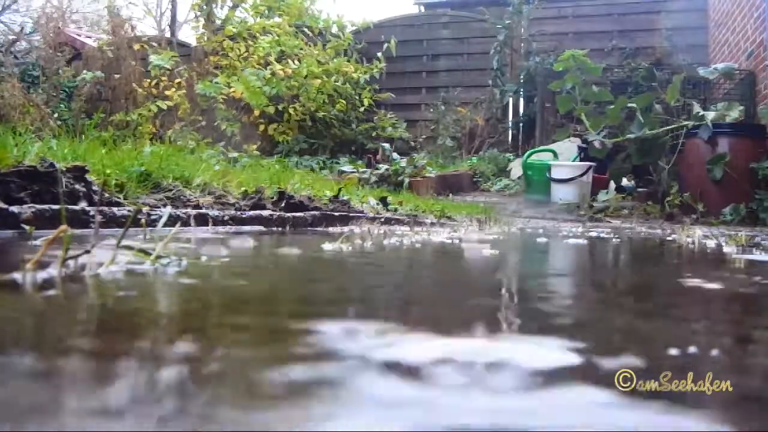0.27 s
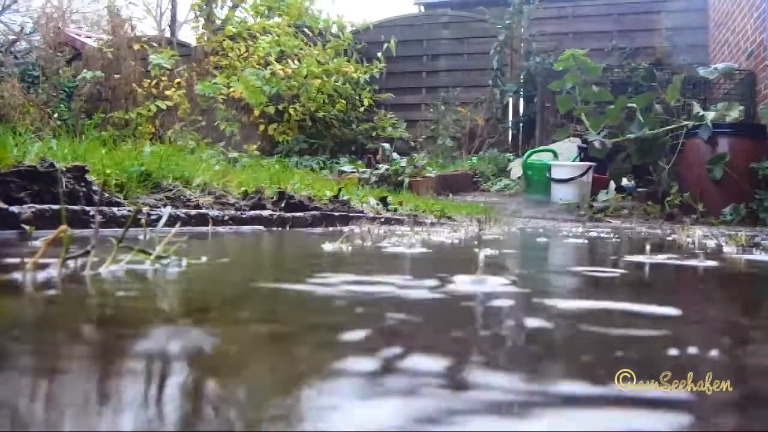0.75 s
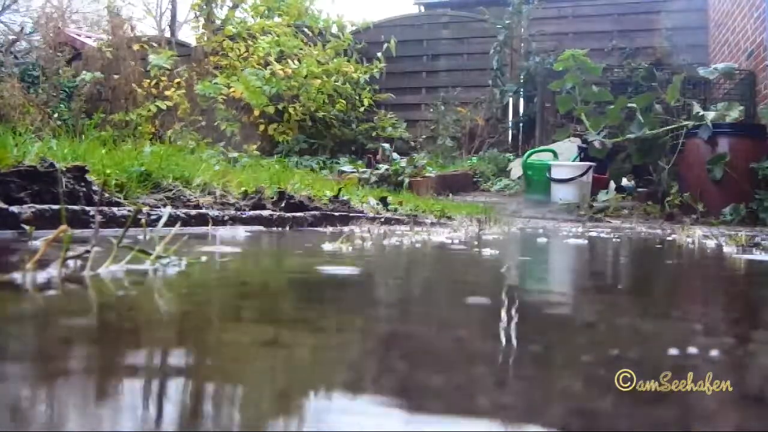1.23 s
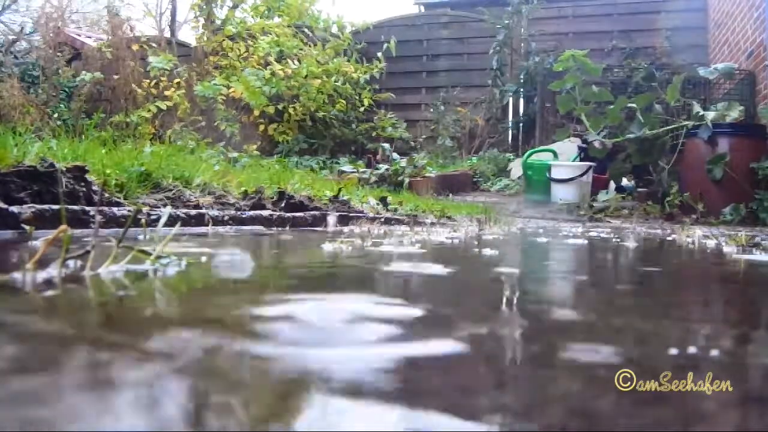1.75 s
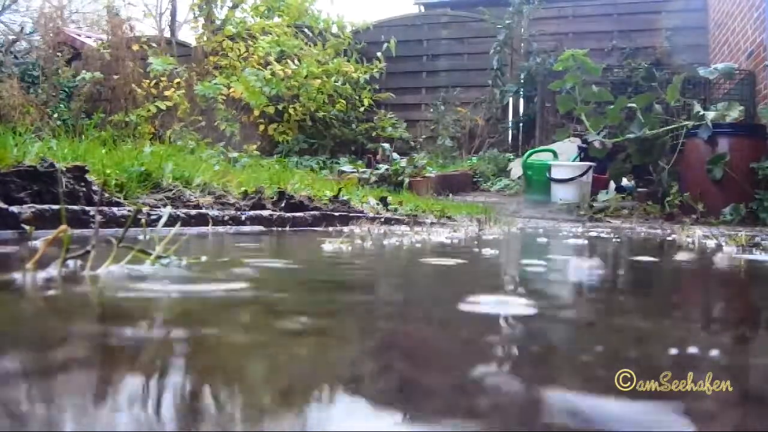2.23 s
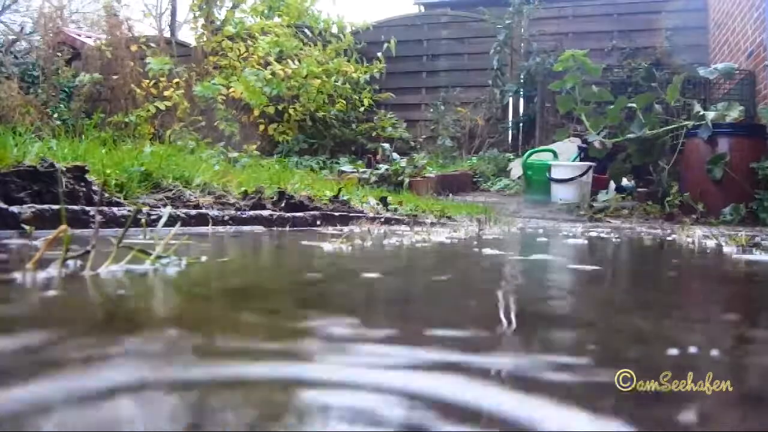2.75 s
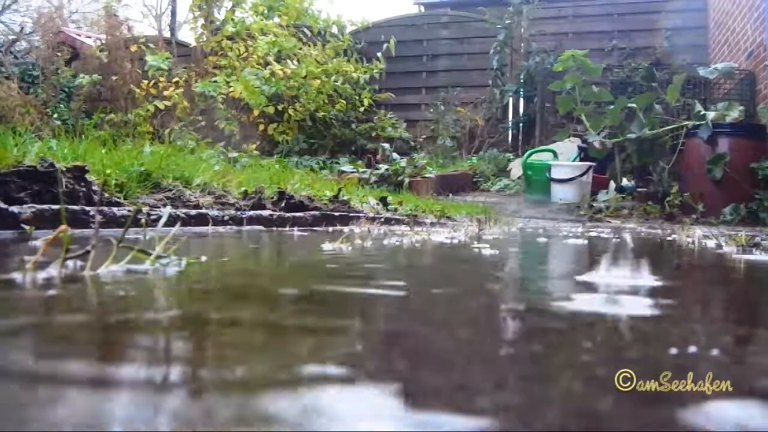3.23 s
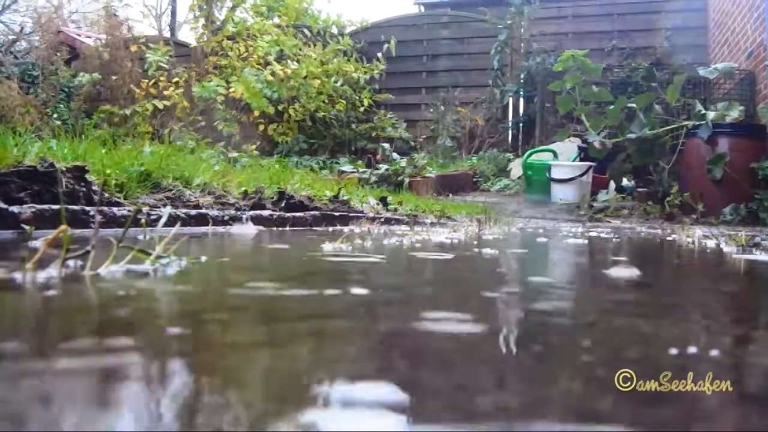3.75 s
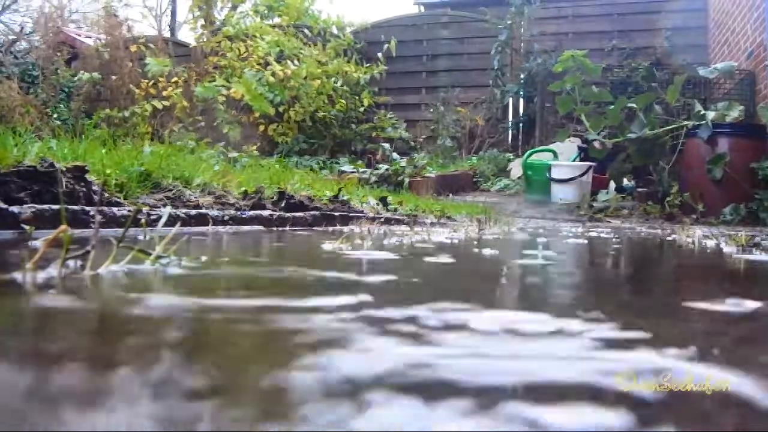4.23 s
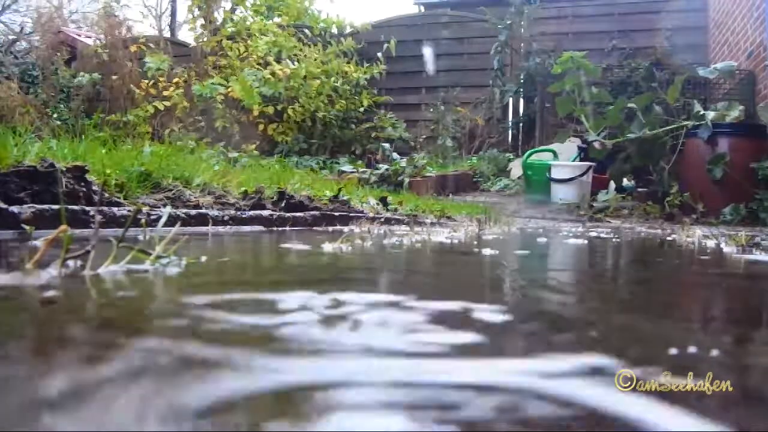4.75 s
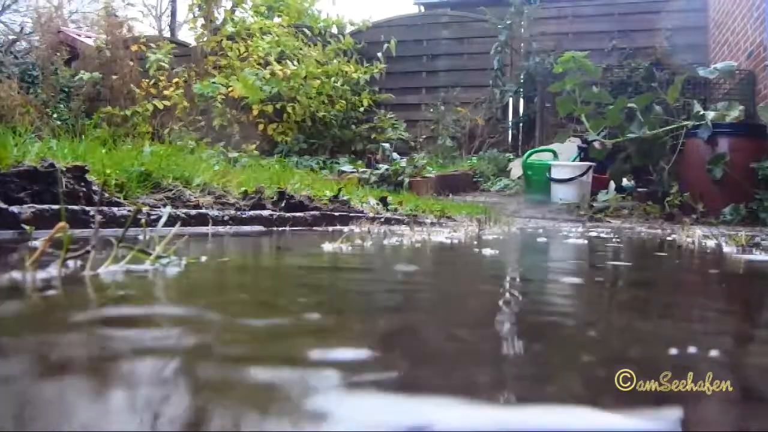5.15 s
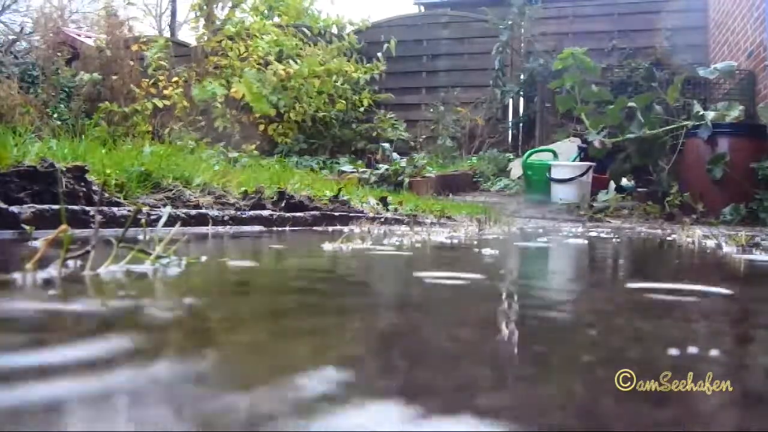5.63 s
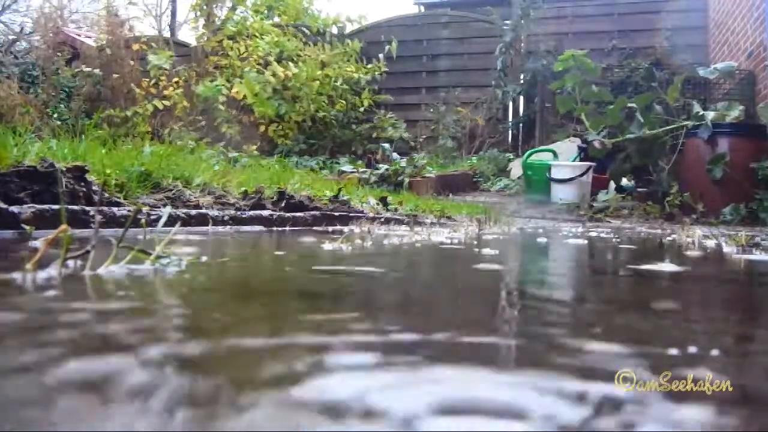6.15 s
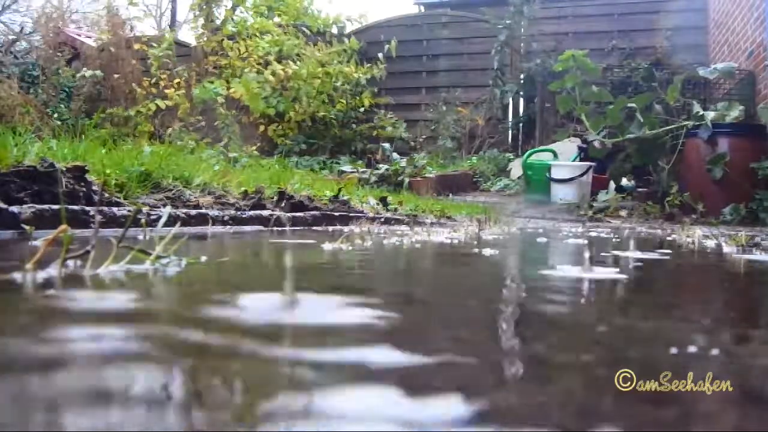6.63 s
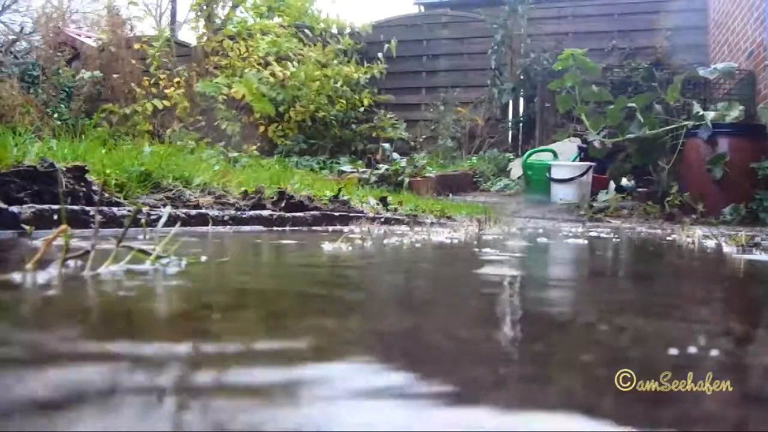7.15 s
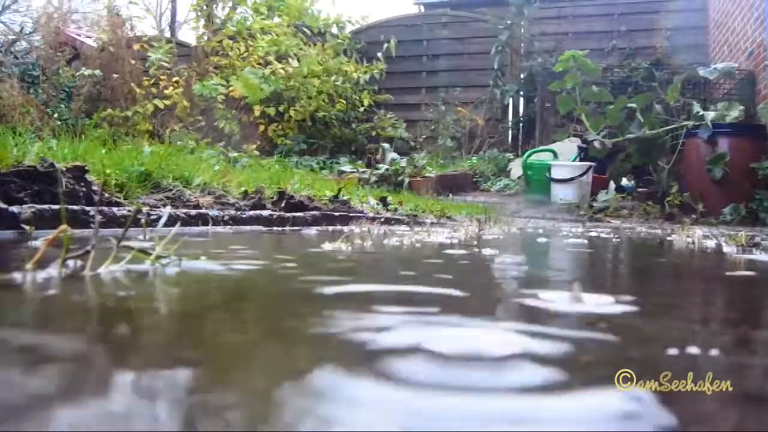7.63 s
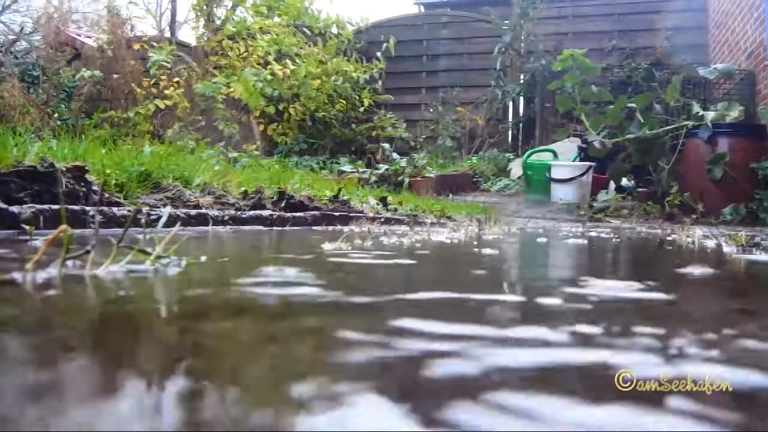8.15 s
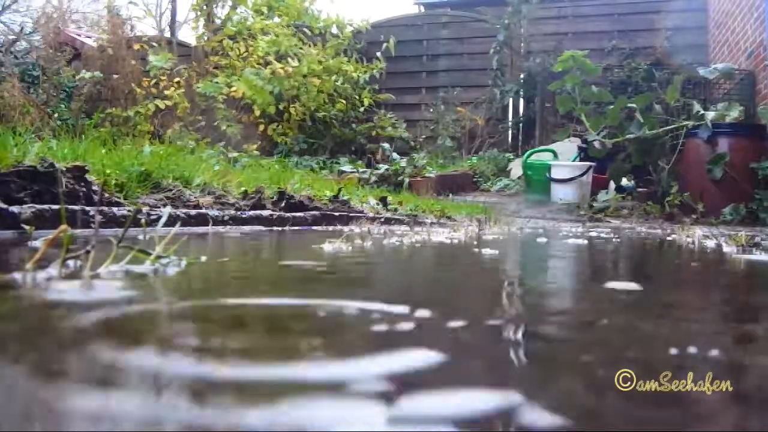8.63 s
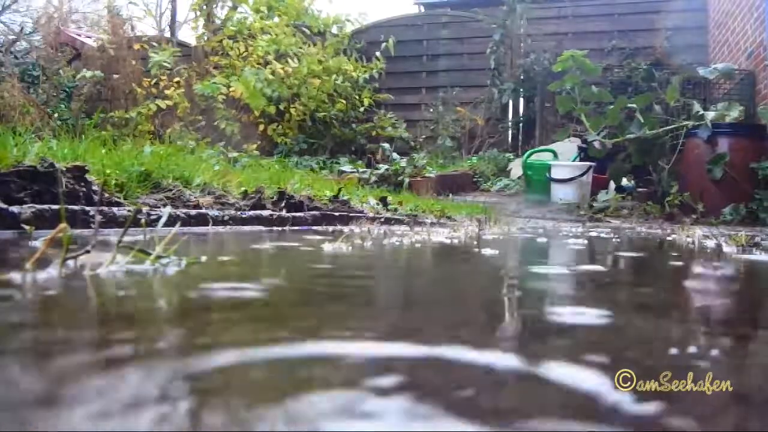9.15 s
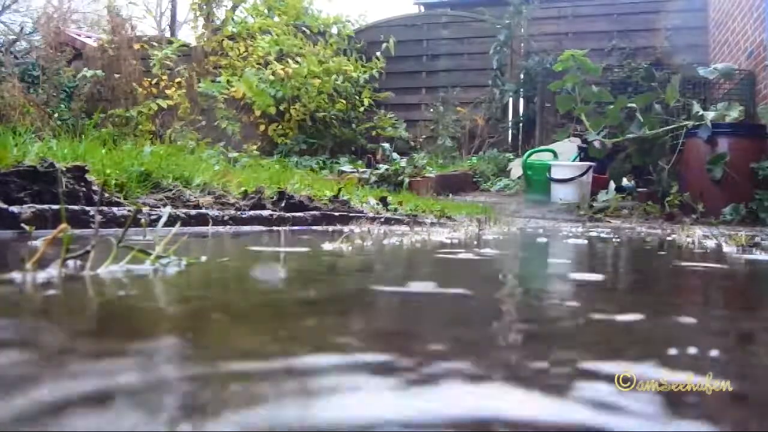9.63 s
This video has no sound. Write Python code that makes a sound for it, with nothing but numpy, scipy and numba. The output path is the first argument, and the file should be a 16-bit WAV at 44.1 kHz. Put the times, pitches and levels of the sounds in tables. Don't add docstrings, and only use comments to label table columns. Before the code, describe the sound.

Steady rain hisses over a soft low drumming in a garden, with bright puddle plinks and a few startlingly loud knocks on a small hard casing.

```python
import sys
import numpy as np
from scipy import signal
from scipy.fft import rfft, irfft
from scipy.io import wavfile
from scipy.ndimage import uniform_filter1d
from numba import njit

SR = 44100
rng = np.random.default_rng(int(sys.argv[2]) if len(sys.argv) > 2 else 0)


def bounce(signal):
    frames = np.transpose(np.atleast_2d(signal))
    limited = np.clip(frames, -1, 1)
    pcm = np.round(limited * 32767).astype(np.int16)
    wavfile.write(sys.argv[1], SR, pcm)


def boost(x):
    u = np.asarray(x, float) / 20
    return 10 ** u


N = 435708

# time_s, level_db
RAIN_SWELL = [(0, .5), (.9, .5), (2.1, 0), (2.6, -.5), (3.2, -0.05), (4.6, -0.4), (5.4, -0.26), (6.9, -.5),
              (7.8, 0.2), (8.3, -0.6), (8.8, 0), (9.3, -1), (9.88, -0.5)]
# pitch_hz, level_db_per_hz
RAIN_SPECTRUM = [(15, -34), (30, -15), (160, -14.5), (330, -9), (601, 1), (1280, -7.5), (1500, -7.5),
                 (1680, -12),
                 (3440, -16), (4900, -12), (6350, -6.5), (9270, -16.5), (11700, -28), (12700, -33), (16000, -70)]
# start_s, level_db, pitch_hz
BUBBLES = [(1.5849, -26, 2570), (2.0808, -41, 2420), (2.1807, -37, 980), (2.3359, -41, 2100),
           (2.4174, -51, 1690), (2.4336, -34.5, 4170), (2.9374, -38, 2830), (2.9939, -33, 2150),
           (3.3907, -32, 5750), (5.2242, -35.5, 980), (6.0614, -29, 6200), (6.3756, -34, 2070),
           (6.5353, -38, 3500), (6.7718, -24, 5330), (6.9567, -35, 4910), (7.8386, -32, 6660),
           (7.8573, -41, 3300), (7.87, -38, 2080), (8.0793, -23.5, 5790), (8.8895, -31, 4900),
           (8.8896, -32.5, 3530), (8.8898, -30, 2070), (8.9266, -29.5, 6350), (8.9815, -35, 7600),
           (9.0108, -36, 4770), (9.5479, -37.5, 3080), (6.2134, -19, 4320), (7.7941, -27.5, 6800),
           (8.0793, -34.5, 8500), (7.921, -38, 6600),
           (0.143, -24, 9250), (.4017, -32, 7960), (1.1589, -37, 7770), (1.371, -36, 8800),
          (1.8939, -42, 7990), (2.2545, -39, 9530), (2.2717, -38, 9190), (2.6989, -37, 9320),
          (2.8624, -39, 9850), (2.8898, -39, 9980), (3.5173, -34, 8040), (4.3331, -32, 7600),
          (4.3863, -27.5, 8350), (4.6556, -36, 8520), (5.1592, -35.5, 9530), (5.5472, -40, 11010),
          (6.0618, -35, 9720), (6.1292, -40, 8200), (6.3421, -36, 8650), (6.9565, -32, 10700),
          (7.1857, -29, 8500), (7.2193, -42, 8800), (7.7419, -40, 8200), (7.8698, -29, 7940),
          (8.5204, -36, 10130), (9.2073, -34, 8510), (9.5661, -40, 9770), (9.7119, -30.5, 9350),
          (9.7675, -37, 9480), (9.3382, -41, 10300)]
# start_s, level_db, pitch_hz
SPLATS = [(.3207, -25.5, 7300), (1.2796, -36, 8680), (1.5266, -33, 10200), (1.956, -38, 5020),
          (2.4159, -37, 10110), (2.415, -35, 3900), (2.948, -35, 4430), (3.0521, -35, 9440),
          (3.3767, -34, 9340), (3.4732, -40, 10500), (3.975, -33, 8040), (4.093, -37, 8900),
          (5.2491, -38, 4570), (5.3252, -24, 8800), (5.5554, -35, 9410), (5.5631, -28, 8050),
          (5.934, -23.5, 9000), (6.1155, -34.5, 3900), (6.7461, -35, 8300), (8.745, -31.5, 4880),
          (8.8893, -36, 8360), (9.7767, -41, 9290), (5.5633, -29, 3600), (5.5634, -26, 2920),
          (7.7938, -29, 3700), (7.8221, -35, 3710), (9.6315, -32, 3700), (7.8702, -33.5, 2800),
          (8.079, -36.5, 3270), (6.2694, -32, 5600)]
# start_s, level_db
DROPLETS = [(.2444, -50), (.815, -52), (.8436, -50), (2.0045, -44), (2.1476, -49), (2.2885, -49),
            (2.368, -47), (2.5116, -45), (2.5563, -41), (2.7716, -41), (4.2404, -48), (4.3978, -43),
            (5.0037, -44), (5.5631, -50), (5.7009, -41), (6.2832, -43), (6.5466, -46), (6.9485, -45),
            (7.4039, -41), (7.4198, -47), (7.4827, -45), (7.6861, -46), (7.7601, -49), (7.921, -43),
            (8.3811, -46), (8.6485, -44), (8.8432, -52), (9.0232, -41), (9.8106, -50), (9.8467, -51)]
# start_s, level_db, pitch_hz, t60_s
THUDS = [(2.418, -41, 334, 0.014), (2.4165, -34, 1450, .008), (3.729, -40, 330, 0.018),
         (5.524, -38, 166, 0.019), (6.0, -39, 328, 0.014), (6.164, -36, 200, 0.012),
         (6.213, -23.5, 443, 0.01), (6.2135, -43, 250, 0.0084), (7.8695, -24.5, 183, 0.027),
         (7.8697, -24, 400, 0.011), (7.8692, -31.5, 1420, 0.02), (8.981, -44, 149, 0.018),
         (8.982, -39, 1540, 0.01)]
# start_s, level_db, sharpness_db_per_octave, face
STRIKES = [
    (.4927, 1.5, 3, "front"),
    (1.474, 1, 0.6, "top"),
    (1.7457, -11.5, 2.5, "side"),
    (6.2131, -14.5, 0.5, "side"),
    (7.0771, 4.5, 2, "top"),
]
# pitch_hz, t60_s, top_db, front_db, side_db
PANEL_RINGS = [(310, 0.015, -24, -24, -16), (560, 0.015, -24.5, -43, -39), (1130, 0.018, -30.5, -35, -26),
               (2800, 0.0037, 3, -17, -31), (3920, 0.0036, 3.5, -37, -5.5), (4560, 0.0046, 0, -9, -32),
               (4730, 0.038, -39.5, -59, -50), (5450, 0.0033, -6.5, 7.5, -8),
               (6290, 0.0029, -0.5, 4.5, 0.5), (6950, 0.014, -22, -21, -21), (7620, 0.0091, -25, -10, -15),
               (8800, 0.0026, -8.5, -35, -7.5), (10200, 0.0025, -24, -6.5, -15),
               (11200, 0.0019, -21, -24, -21)]
FACE_SWINGS = {"top": "+++-+-+-+-+-++", "front": "+++--++-++-+-+", "side": "+-+++++++-++++"}


def rain():
    f = np.maximum(np.arange(N // 2 + 1) * SR / N, 1)
    hz, db = np.transpose(RAIN_SPECTRUM)
    colour = boost(np.interp(np.log(f), np.log(hz), db))
    far = rfft(rng.standard_normal(N))
    soil = rfft(patter(per_s=900, spread_db=6.3))
    leaves = rfft(patter(per_s=2000, spread_db=1.2))
    water = rfft(patter(per_s=2500, spread_db=3.7))
    spray = rfft(smear(patter(per_s=600, spread_db=3.4), t60=0.004, db=-20))
    near_by_band = [soil] * 11 + [leaves] * 3 + [water] * 2 + [spray] * 2
    drumming, hiss = 0, 0
    for k, near in enumerate(near_by_band):
        offset = np.log2(f / 40) * 2 - k
        band = colour * np.cos(np.pi / 2 * np.clip(offset, -1, 1)) ** 2
        near_share = np.interp(k, [0, 8, 12, 15, 17], [0.05, 0.15, 0.46, 0.29, 0.28])
        mix = np.sqrt(1 - near_share) * far + np.sqrt(near_share) * near
        flicker_db = 0.5 * walk(6) + 0.7 * walk(25)
        x = irfft(band * mix, N) * boost(flicker_db)
        if k < 12:
            drumming = drumming + x
        else:
            hiss = hiss + x
    both = drumming / drumming.std() * boost(-50) + hiss / hiss.std() * boost(-48.5)
    time_s, swell_db = np.transpose(RAIN_SWELL)
    return both * boost(np.interp(np.arange(N) / SR, time_s, swell_db))


def puddle_drops():
    droplet_t60 = 0.003
    drops = [(s, db, hz, 0.003 * (hz / 5000) ** -0.47) for s, db, hz in BUBBLES]
    drops += [(s, db, hz, 9 / hz) for s, db, hz in SPLATS]
    drops += [(s, db, 11160 - 80 * (db + 46), droplet_t60) for s, db in DROPLETS]
    drops += mist(count=90, level_db=-53.5, hz=10800, octaves=0.12, t60=droplet_t60)
    drops += mist(count=250, level_db=-42.5, hz=6080, octaves=0.14, t60=0.005)
    ticks = [(s - 0.0002, db - 14, min(1.35 * hz, 11600), 0.0018) for s, db, hz, t60 in drops]
    rings = tone_bank(drops, rise=0.15, glide=0.05, early=1) * boost(-0.24)
    return rings + tone_bank(ticks, rise=0.15, glide=0, early=1)


def mist(count, level_db, hz, octaves, t60):
    when, size, pitch = rng.random((count, 3)).T
    start_s = 0.05 + 9.7 * when
    db = level_db - np.log(1 - 0.95 * size)
    pitch_hz = np.minimum(hz * 2 ** (octaves * (4 * pitch - 2)), 12500)
    return [(s, d, p, t60) for s, d, p in zip(start_s, db, pitch_hz)]


def soil_thuds():
    return tone_bank(THUDS, rise=0.015, glide=0.05)


def housing_strikes():
    swing = {"+": [], "-": []}
    for s, db, sharp_db, face in STRIKES:
        column = list(FACE_SWINGS).index(face)
        for way, (hz, t60, *face_db) in zip(FACE_SWINGS[face], PANEL_RINGS):
            ring_db = db + face_db[column] + sharp_db * np.log2(hz / 4000)
            swing[way].append((s, ring_db, hz, t60))
    outward = tone_bank(swing["+"], rise=0.031, glide=0.035)
    inward = tone_bank(swing["-"], rise=0.031, glide=0.035)
    return smear(outward - inward, t60=0.011, db=-32)


def camera_whine():
    hz = 1467.2 + 14 * walk(12)
    return boost(-68) * np.sqrt(2) * np.sin(2 * np.pi * np.cumsum(hz) / SR)


def tone_bank(rows, rise, glide, early=0):
    out, t = np.zeros(N + 4096), np.arange(4096) / SR
    for s, db, hz, t60 in rows:
        t60 = max(t60, 0.001)
        swell = (1 - np.exp(-t / (rise * t60))) ** 2
        shape = swell * np.exp(-np.log(1000) * t / t60)
        turns = hz * (t + glide * np.minimum(t, t60) ** 2 / t60)
        i = int(s * SR) - early * np.argmax(shape)
        out[i:i + 4096] += boost(db) * shape / shape.max() * np.cos(2 * np.pi * turns)
    return out[:N]


def patter(per_s, spread_db):
    hit = rng.random(N) < per_s / SR
    size_db = spread_db * np.minimum(rng.exponential(size=N), 3)
    x = hit * rng.standard_normal(N) * boost(size_db)
    return x / x.std()


def smear(x, t60, db):
    t = np.arange(2048) / SR
    tail = rng.standard_normal(2048) * np.exp(-np.log(1000) * t / t60) * (t > 0.0006)
    return x + signal.fftconvolve(x, tail)[:N] * boost(db)


def walk(rate):
    k = int(SR / rate)
    held = np.repeat(rng.standard_normal(N // k + 1), k)
    return 1.2 * uniform_filter1d(uniform_filter1d(held, k), k)[:N]


@njit
def duck(x, top, ratio, attack, release):
    y, e = np.empty(len(x)), 0.
    for i in range(len(x)):
        a = abs(x[i])
        e += (a - e) * (attack if a > e else release)
        y[i] = x[i] * (max(e, top) / top) ** (1 / ratio - 1)
    return y


def scene():
    near = smear(puddle_drops() + soil_thuds(), t60=0.027, db=-26.5) + housing_strikes()
    near = signal.sosfilt(signal.butter(2, 110, "highpass", fs=SR, output="sos"), near)
    return (rain() + near + camera_whine())[None]


def band_limit(x):
    return signal.sosfilt(signal.butter(12, 12830, fs=SR, output="sos"), x)


def record(dry):
    x = signal.sosfilt(signal.butter(8, 12200, fs=SR, output="sos"), dry[0])
    x = duck(x, 0.049, 1.85, 0.0057, 0.00032)
    x = np.clip(x, -1, 1)
    x = signal.sosfilt(signal.butter(4, 13000, fs=SR, output="sos"), x) * boost(-0.42)
    return band_limit(x[None])


dry = scene()
out = record(dry)
bounce(out)
```